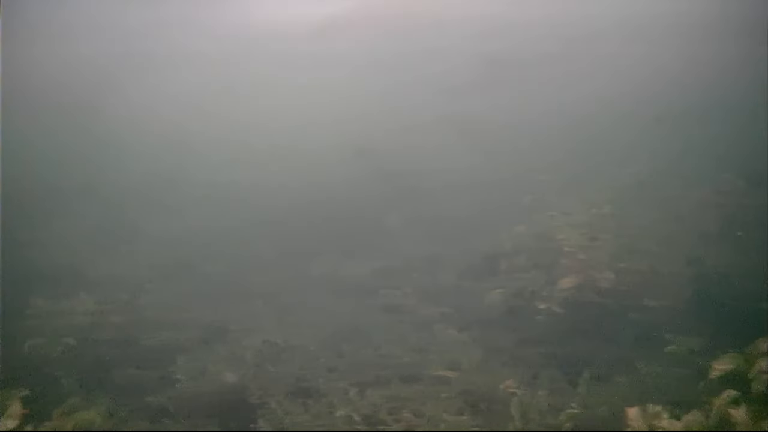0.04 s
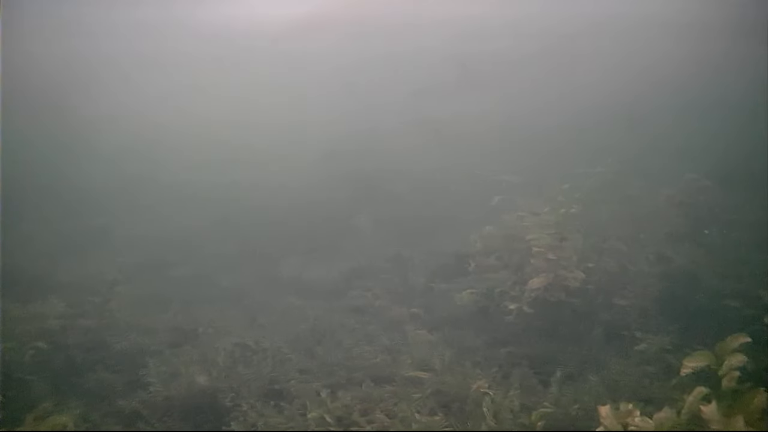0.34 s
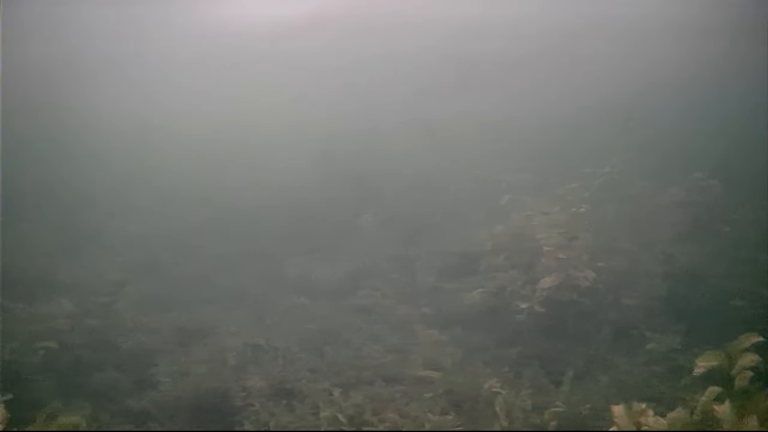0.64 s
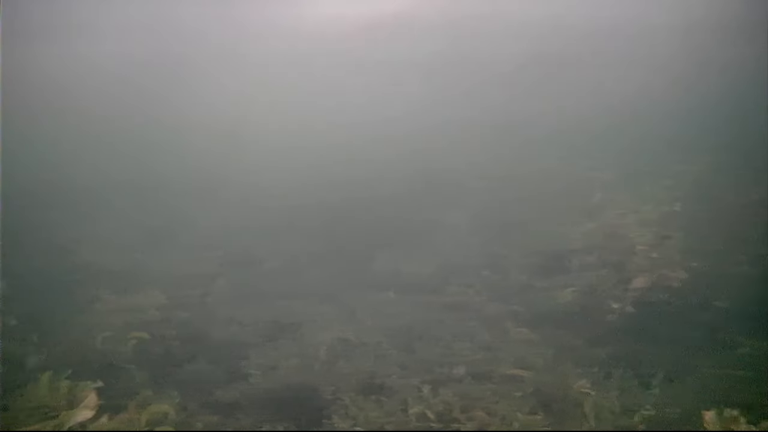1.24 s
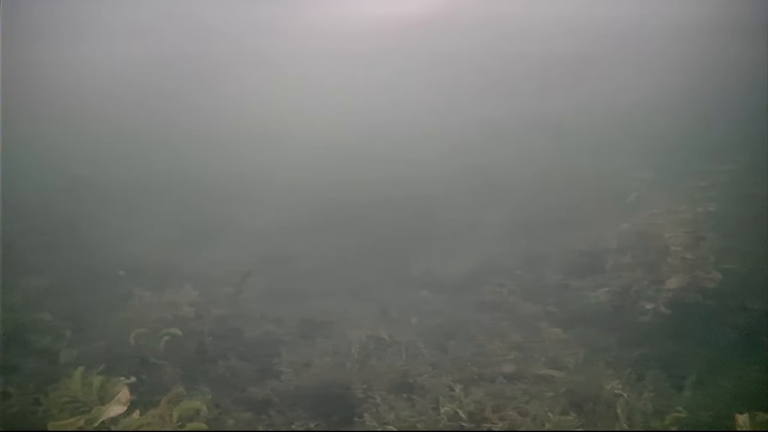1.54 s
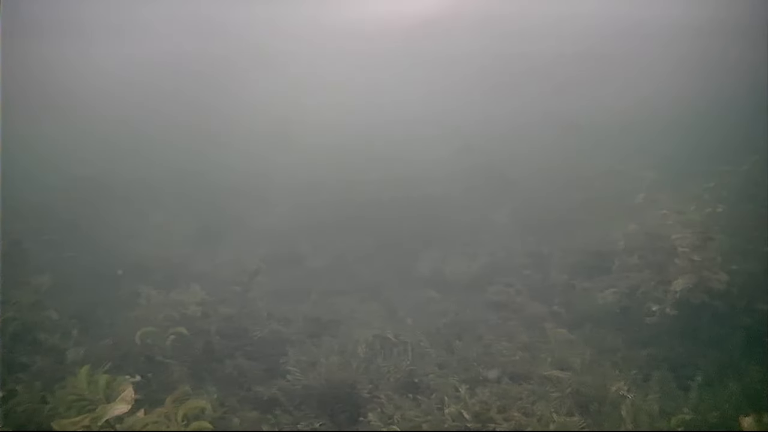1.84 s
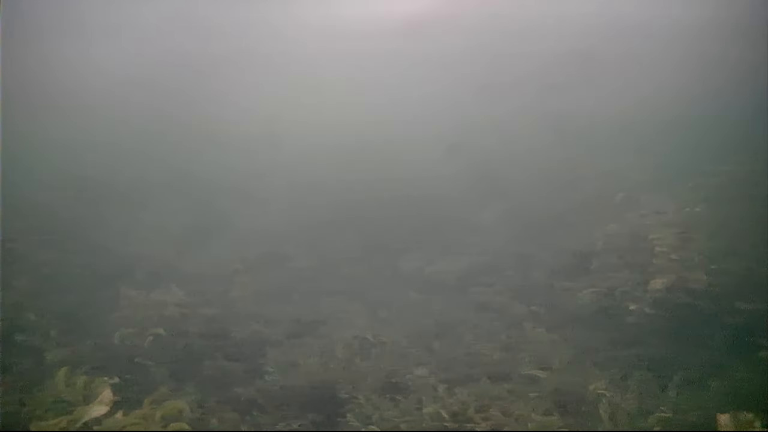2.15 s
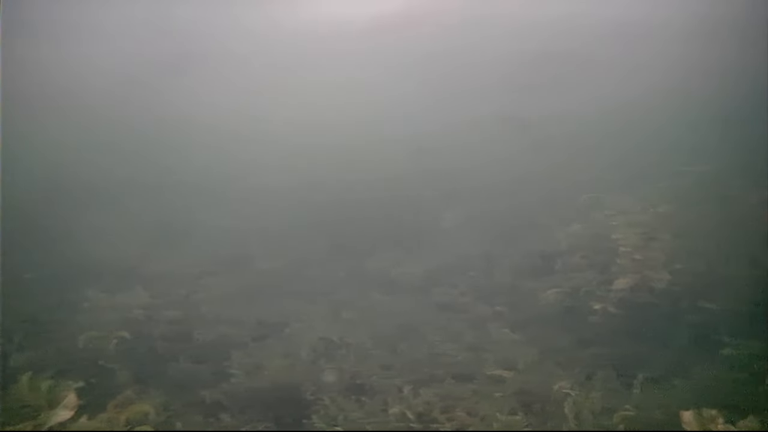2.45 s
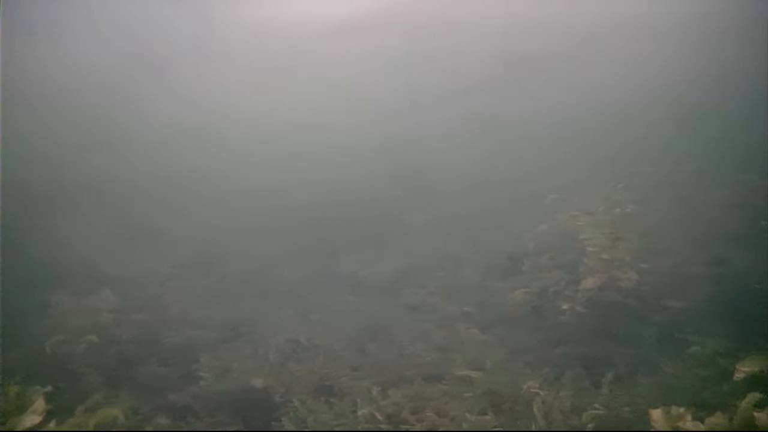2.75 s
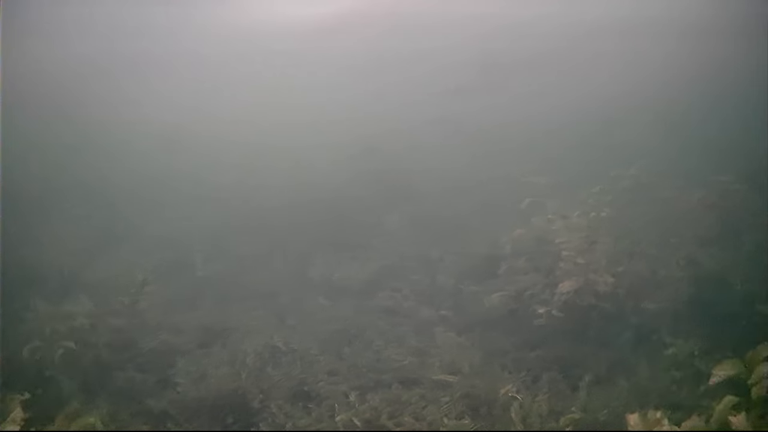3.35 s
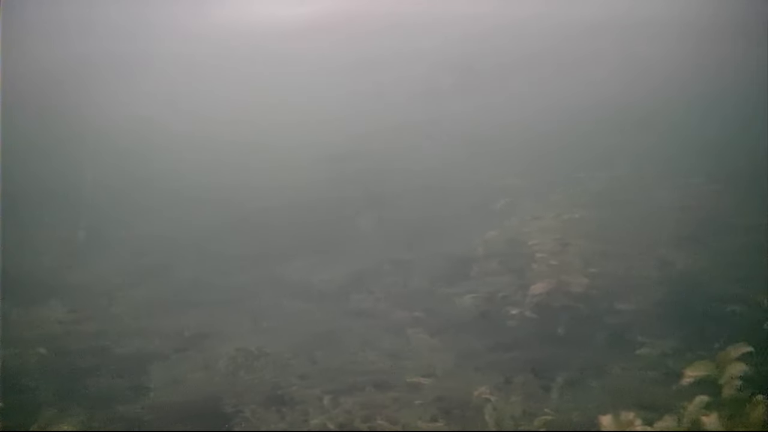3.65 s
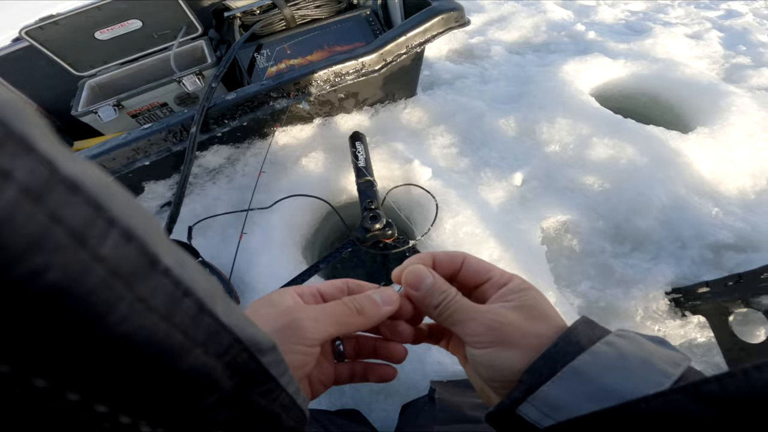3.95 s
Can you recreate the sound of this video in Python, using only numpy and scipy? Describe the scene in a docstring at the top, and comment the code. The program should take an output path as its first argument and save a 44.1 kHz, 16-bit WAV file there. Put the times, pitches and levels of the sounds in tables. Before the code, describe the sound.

Gritty scraping from a dragged cable reaches a microphone under the ice. After a quiet start with light scuffs, it crunches and breaks into rapid, uneven clicks and some soft knocks, while a low rumble and hiss continue.

```python
"""Under water, below ice and snow, a camera hangs on a cable that is dragged across the surface.
Friction excites its housing: gritty scuffs, then a scrape that breaks into sharp stick-slip snaps,
each a crack together with the decaying ring of the housing's modes. Faint ticking, a few dull bumps
and one slow heave of the water come through as well. Two microphone ports hear it all,
over a low rumble and a steady hiss."""
import sys
import numpy as np
from scipy import signal
from scipy.fft import rfft, irfft
from scipy.io import wavfile
from scipy.ndimage import uniform_filter1d

SR = 44100
rng = np.random.default_rng(int(sys.argv[2]) if len(sys.argv) > 2 else 0)


def to_wav(s):
    """Save 16-bit WAV."""
    ch = np.atleast_2d(s).T  # columns
    pcm = np.round(np.clip(ch, -1, 1) * 32767)  # PCM
    wavfile.write(sys.argv[1], SR, pcm.astype(np.int16))


N = 176400
TIME = np.arange(N) / SR
TAP_HZ = abs(np.fft.fftfreq(2048, 1 / SR))  # frequency grid of the colouring filters
GRAIN_T60_S = 0.014  # ring time of a tiny slip

# normal modes of the housing (frequency [Hz], relative level [dB], t60 [s])
HOUSING = [(997, 12.5, 0.069), (1220, 15.5, 0.0077), (1377, 8.5, 0.031), (1506, 11, 0.0075),
           (1818, 5.5, 0.029), (2270, 9.5, 0.021), (2467, 8.5, 0.018), (2833, 4.5, 0.022)]
# envelopes of the scrape's three bands (time [s], middle [dB], treble [dB], low rub [dB])
DRAG = [(1.62, -103, -78, -79), (1.74, -68, -62, -73.5), (1.87, -55.5, -55.5, -59.5), (2.03, -48, -50, -57),
        (2.25, -51, -51.5, -53.5), (2.41, -49, -52, -56.5), (2.49, -49, -49.5, -49.5),
        (2.67, -52.5, -52.5, -57.5), (2.95, -54, -56.5, -67.5), (3.16, -49, -55.5, -59),
        (3.34, -53, -55, -61.5), (3.47, -53.5, -57, -70.5), (3.62, -60.5, -57, -62),
        (3.7, -52.5, -56, -56.5), (3.9, -67, -64.5, -74.5), (4, -65, -62, -72)]
# treble spectrum of tiny slips (frequency [Hz], gain [dB])
GRIT = [(2200, 2), (3400, 6.5), (4100, 5.5), (5600, 0.5), (7300, 1), (8300, -7), (9500, -8), (12500, -8.5),
        (14000, -27), (16000, -43)]


def amp(db):
    """Decibels to amplitude ratio."""
    return 10 ** (np.asarray(db) / 20)


def unit(x):
    """Normalisation to rms 1."""
    return x / np.sqrt(np.mean(x ** 2) + 1e-20)


def burst(x):
    """Normalisation to the energy of 5 ms at rms 1."""
    return x * np.sqrt(.005 * SR / (np.sum(x ** 2, axis=-1, keepdims=True) + 1e-20))


def read(points, hz):
    """Interpolation on a log-frequency axis."""
    f, value = np.transpose(points)
    return np.interp(np.log(hz + 1), np.log(f + 1), value)


def add(mix, s, sound):
    """Superposition: a sound joins the mix at time s."""
    part = mix[..., round(s * SR):][..., :sound.shape[-1]]
    part += sound[..., :part.shape[-1]]


def colour(x, db):
    """Minimum-phase filtering with gains db at TAP_HZ; the ring-out is kept."""
    log_gain = np.log(amp(db))
    taps = np.fft.ifft(np.exp(np.conj(signal.hilbert(log_gain)))).real
    return signal.fftconvolve(x, taps[None, :len(taps) // 2], axes=1)


def noise(points):
    """Spectral shaping of two uncorrelated white noises."""
    white = rfft(rng.standard_normal((2, N)))
    return unit(irfft(white * amp(read(points, np.fft.rfftfreq(N, 1 / SR))), N))


def hiss():
    """Microphone self-noise, uncorrelated between the channels."""
    # noise spectrum (frequency [Hz], relative density [dB])
    spectrum = [(200, 14), (450, 1.5), (750, -4.5), (1500, 0), (2600, -4.5), (3300, -11.5), (5000, -9),
                (7500, -8), (9500, -18), (11200, -12), (12200, -7.5), (13200, -13), (14000, -37)]
    return amp(-67.5) * noise(spectrum)


def rumble():
    """Stationary noise with its energy at low frequencies."""
    # noise spectrum (frequency [Hz], relative density [dB])
    spectrum = [(45, 2.5), (80, 0.5), (100, -1), (111, -3), (120, 4), (128, -4.5), (146, -8), (177, -13.5),
                (230, -24), (280, -32), (400, -48.5), (1500, -99)]
    return amp(-42.5) * noise(spectrum)


def heave():
    """One slow pressure wave in the water, so long that both ports hear it alike."""
    # Gaussian wave packet (centre time [s], peak level [dB], frequency [Hz], 1/e half-width [s])
    packet = (2.578, -25, 13, .04)
    s, db, hz, width = packet
    return amp(db) * np.cos(2 * np.pi * hz * (TIME - s)) * np.exp(-((TIME - s) / width) ** 2)


def ticking(count=400, pace_hz=60, growth_db_per_s=1.5):
    """A filtered impulse train: faint, dull ticks in loosely regular runs with pauses between."""
    # spectrum of a tick (frequency [Hz], gain [dB])
    spectrum = [(300, -11.5), (800, -11.5), (1050, -12), (1550, 2), (2650, -6.5), (3200, -14.5),
                (5000, -15), (16000, -81)]
    jitter, size, pause = rng.standard_normal((count, 3)).T
    gaps = np.exp(.17 * jitter) + .6 * np.maximum(pause, 0) ** 2
    at = (np.cumsum(gaps) / pace_hz * SR).astype(int)
    train = np.zeros((2, N))
    train[0, at[at < N]] = amp(1.7 * size[at < N])
    level_db = -78 + growth_db_per_s * np.minimum(TIME - DRAG[0][0], 0)  # grows until the scrape starts
    return amp(level_db) * unit(colour(train, read(spectrum, TAP_HZ))[:, :N])


def bumps():
    """Impact excitation: soft blows ring the low modes, and a shorter contact sounds brighter."""
    # blows on the housing (time [s], level [dB], contact time [s])
    blows = [(2.349, -27.5, 0.0025), (2.648, -29, 0.0048), (3.561, -22, 0.004), (3.567, -22, 0.00016),
             (3.738, -40, 0.00083), (3.792, -39, 0.003), (3.988, -42, 0.00041), (2.065, -36.5, 0.0019)]
    # modes that a blow excites (frequency [Hz], relative level [dB], t60 [s])
    modes = [(85, -2, 0.12), (254.5, -2, 0.082), (350, -2.5, 0.065), (670, -5, 0.021), (924, -6.5, 0.024),
             (1300, 5, 0.0038)]
    out, t = np.zeros((2, N)), np.arange(SR // 5) / SR
    ring = sum((-1) ** k * amp(db - 60 * t / t60) * np.sin(2 * np.pi * hz * t)
               for k, (hz, db, t60) in enumerate(modes))
    for s, db, contact in blows:
        force = np.sin(np.pi * np.minimum(t / contact, 1)) ** 2
        add(out[0], s, amp(db) * signal.fftconvolve(ring, force / force.sum())[:len(t)])
    return out


def scuffs(rise_s=0.00083, fade_db=-19.5, roughness_db=3.5):
    """Granular crushing: clumps of grains give way in short bursts of rough noise."""
    # crushed clumps (time [s], length [s], level [dB], tilt above 1 kHz [dB/octave])
    clumps = [(0.454, 0.0046, -61.5, 7), (0.524, 0.0099, -51.5, 3.5), (0.534, 0.15, -63.5, -1),
              (0.568, 0.014, -60.5, 0), (0.611, 0.021, -60.5, 1), (0.936, 0.0063, -59.5, 6),
              (1.014, 0.081, -76, 3), (1.137, 0.005, -65.5, -4), (1.176, 0.0055, -63.5, -1),
              (1.514, 0.055, -73, -1), (1.77, 0.0064, -51.5, -1), (1.856, 0.0079, -48.5, 4.5),
              (1.873, 0.026, -46.5, 0), (1.893, 0.02, -39, 0), (1.907, 0.11, -52.5, -1.5),
              (1.924, 0.013, -48, 1), (1.933, 0.0097, -36.5, 2), (1.965, 0.009, -39, 0),
              (2, 0.015, -44, -2), (2.055, 0.016, -39, 1), (2.459, 0.074, -42.5, -7.5),
              (3.85, 0.024, -50, -0.5)]
    # spectrum of a scuff (frequency [Hz], gain [dB])
    spectrum = [(290, -27), (500, -10.5), (831, -12), (919, -3), (1340, -2), (1570, -1), (1790, 6),
                (2750, -6.5), (4050, 0), (6610, -4), (7210, 1), (8700, -6), (12900, -9), (16000, -34)]
    out, grains = np.zeros((2, N)), rng.standard_normal((2, N))
    grains *= amp(roughness_db * rng.standard_normal(N // 32 + 1).repeat(32)[:N])
    octaves = np.log2(np.maximum(TAP_HZ, 1000) / 1000)
    for s, length, db, tilt in clumps:
        t = np.arange(0, length, 1 / SR)
        push = np.minimum(t / rise_s, 1) * amp(fade_db * (t / length) ** 2)
        crush = grains[:, round(s * SR):][:, :len(t)] * push
        sound = colour(crush, read(spectrum, TAP_HZ) + tilt * octaves)
        add(out, s, amp(db) * unit(sound) * np.sqrt(len(t) / sound.shape[1]))
    return out


def grind(spectrum, kinds=10, slips_per_s=3300, spread_db=4):
    """Shot noise: dense, uneven slips, each with one of several short rings, through one filter."""
    slips = (rng.random(N) < slips_per_s / SR) * amp(spread_db * np.minimum(rng.exponential(1, N), 5))
    slips *= rng.choice([-1, 1], N)
    kind, t = rng.integers(0, kinds, N), np.arange(512) / SR
    rings = rng.standard_normal((kinds, 2, len(t))) * amp(-60 * t / GRAIN_T60_S)
    grains = sum(signal.oaconvolve((slips * (kind == k))[None], ring, axes=1)
                 for k, ring in enumerate(rings))
    return unit(colour(grains, read(spectrum, TAP_HZ))[:, :N])


def scrape():
    """Sliding friction of the cable: a ringing middle, a gritty treble and a low rub."""
    # spectrum of the ringing middle (frequency [Hz], gain [dB])
    ringing = [(500, -42), (800, -7.5), (1000, 4.5), (1400, 9.5), (1620, 7.5), (1810, 10.5), (2270, 13.5),
               (2550, -8), (2900, 6), (3500, -23), (5000, -53)]
    # spectrum of the low rub (frequency [Hz], gain [dB])
    rub = [(110, -22), (165, 1.5), (260, -3), (400, -4), (550, -11), (750, -15), (1200, -61), (2500, -46.5)]
    s, middle, treble, low = np.transpose(DRAG)
    bands = (ringing, middle - 1.5), (GRIT, treble - 1.5), (rub, low + 4.5)
    return sum(grind(spectrum) * amp(np.interp(TIME, s, db, left=-np.inf)) for spectrum, db in bands)


def surges(spread_db=4.5, smoothing_s=0.021):
    """Amplitude modulation: the cable's grip comes and goes at random."""
    width = int(smoothing_s * SR)
    grip = uniform_filter1d(uniform_filter1d(rng.standard_normal(N), width), width)
    return amp(spread_db * unit(grip))


def chatter(slips_per_s=140, spread_db=10.5, centre_hz=2220, crack_db=-11):
    """Random excitation: small slips, each with a tiny crack, keep the upper housing modes ringing."""
    # envelope as the cable starts to stick (time [s], level [dB])
    envelope = [(2.2, -63.5), (2.7, -55.5), (2.9, -42.5), (3.18, -50.5), (3.21, -56)]
    t, rings = np.arange(2048) / SR, 0
    slips = (rng.random(N) < slips_per_s / SR) * amp(spread_db * np.clip(rng.standard_normal(N), -2, 1))
    for hz, db, t60 in HOUSING:
        mode = amp(db - 60 * t / t60) * np.sin(2 * np.pi * hz * t)
        mode /= 1 + (2 * np.log2(hz / centre_hz)) ** 2
        rings += signal.oaconvolve(slips * rng.standard_normal((2, N)), mode[None], axes=1)
    crack = rng.standard_normal((2, len(t))) * amp(-60 * t / GRAIN_T60_S)
    cracks = colour(signal.oaconvolve(slips[None], crack, axes=1), read(GRIT, TAP_HZ))
    sound = unit(rings[:, :N]) + amp(crack_db) * unit(cracks[:, :N])
    return sound * amp(np.interp(TIME, *np.transpose(envelope), left=-np.inf, right=-np.inf))


def snaps():
    """Stick-slip: each sudden release cracks and rings the housing modes near its pitch."""
    # slips (time [s], ring level [dB], ring pitch [Hz], crack level [dB], crack pitch [Hz])
    slips = [(2.2286, -35, 1560, -42, 6400), (2.2626, -36.5, 1940, -45, 5840),
             (2.315, -49, 1900, -42, 6700), (2.3438, -41, 2160, -38, 7220),
             (2.3554, -35, 1940, -35.5, 7800), (2.3917, -38.5, 1860, -43.5, 6460),
             (2.484, -33, 1570, -43, 4800), (2.5418, -59, 2140, -39, 6700),
             (2.5905, -28, 1800, -39.5, 5900), (2.635, -35, 2150, -34.5, 7100),
             (2.6478, -34.5, 1660, -36.5, 6860), (2.697, -34, 2370, -35.5, 5500),
             (2.7012, -33, 2300, -36, 6200), (2.7825, -35, 2220, -39, 6540), (2.8105, -38, 2060, -54, 5200),
             (2.866, -50, 2210, -37, 5100), (2.8782, -32.5, 1790, -45, 4900),
             (2.8917, -36, 2200, -41, 5200), (2.8993, -24.5, 2464, -41, 5260),
             (2.9119, -29.5, 1750, -32.5, 4470), (2.935, -45, 1790, -43, 6500),
             (2.9464, -25.5, 2640, -23.5, 5400), (2.955, -35, 2270, -59, 5200),
             (2.9667, -23.5, 2400, -31, 5500), (2.9961, -29, 1610, -47, 5800),
             (3.0029, -27, 2120, -56, 5200), (3.0104, -38, 2080, -46, 5300), (3.016, -39, 2300, -42, 5570),
             (3.0254, -27.5, 2350, -41.5, 5760), (3.056, -63, 2180, -44, 6440),
             (3.0923, -31.5, 2200, -36.5, 6270), (3.1274, -26, 1660, -38, 5530),
             (3.1426, -34, 1970, -42, 5400), (3.1553, -34.5, 2220, -40, 5630),
             (3.1722, -31, 1640, -46, 5900), (3.182, -36, 2160, -43, 5600), (3.201, -17.5, 2010, -23, 4920),
             (3.252, -17, 1790, -27.5, 4630), (3.2827, -26, 1820, -27, 4160),
             (3.2902, -27.5, 1820, -32, 5000), (3.3072, -23, 1750, -24, 4470),
             (3.3245, -35, 1940, -37.5, 5070), (3.3396, -24, 1800, -31, 5930),
             (3.3435, -22.5, 1820, -29, 4180), (3.35, -34.5, 1880, -32, 6900),
             (3.375, -29.5, 1890, -30, 7100), (3.541, -25, 2040, -25.5, 6700),
             (3.6538, -29, 1990, -33.5, 5300), (3.6611, -36.5, 2110, -37, 3940),
             (3.6947, -36.5, 1610, -45, 4280), (3.7191, -40, 2070, -30.5, 5600),
             (3.737, -37.5, 2020, -43, 5500), (3.773, -33.5, 2000, -41.5, 4500),
             (3.8387, -36, 2160, -36, 4930), (3.9423, -39, 2070, -42, 5360)]
    # band of modes excited, narrowing to almost one note (time [s], half-width [octaves])
    ring_width = [(3.26, 0.49), (3.28, 0.17), (3.38, 0.17), (3.65, 0.16)]
    ring_rise_s, overshoot_s, scatter_db, far_modes_db = 0.00024, 0.00079, 2.5, -30
    detune_cycles = 0.67  # random mistuning of a mode, per t60
    crack_rise_s, crack_t60_s, crack_width_oct = 0.00045, 0.016, 0.58
    ripple_db, ripple_spacing_hz = 4.5, 1700  # shifted at random: each crack has its own peaks
    alike = 0.87  # share of a crack's noise power that is the same for every slip
    out, t = np.zeros((2, N)), np.arange(2048) / SR
    attack = (1 - np.exp(-(t / ring_rise_s) ** 2)) * (1 + 0.81 * np.exp(-t / overshoot_s))
    crack_envelope = amp(-60 * t / crack_t60_s) * (1 - np.exp(-t / crack_rise_s))
    shared = rng.standard_normal((2, len(t)))
    hz, db, t60 = np.transpose(HOUSING)[:, :, None]
    for s, ring_db, ring_hz, crack_db, crack_hz in slips:
        size, tune, phase = rng.standard_normal((3, 2, len(hz), 1))
        near = 1 / (1 + (np.log2(hz / ring_hz) / np.interp(s, *np.transpose(ring_width))) ** 4)
        weight = amp(db + scatter_db * size) * (near + amp(far_modes_db))
        mode_hz = hz + detune_cycles * tune / t60
        modes = weight * amp(-60 * t / t60) * np.sin(2 * np.pi * mode_hz * t + np.pi * phase)
        add(out, s, amp(ring_db - 1.5) * burst(modes.sum(1) * attack))

        # spectrum of a crack (frequency [Hz], gain [dB])
        spectrum = [(700, 3), (2500, 1), (3450, 4), (4080, 6), (4750, 3.5), (5400, -1), (5800, -7.5),
                    (6150, 4), (6750, -4), (7250, 1), (9400, -7), (12500, -5.5), (14000, -15), (16000, -33)]
        crack = np.sqrt(alike) * shared + np.sqrt(1 - alike) * rng.standard_normal((2, len(t)))
        focus = -10 * np.log10(1 + (np.log2((TAP_HZ + 1) / crack_hz) / crack_width_oct * 2) ** 2)
        ripple = ripple_db * np.cos(2 * np.pi * (TAP_HZ / ripple_spacing_hz + rng.random()))
        crack = colour(crack * crack_envelope, read(spectrum, TAP_HZ) + focus + ripple)
        add(out, s, amp(crack_db - 3.5) * burst(crack))
    return out


def slip_highpass(x, cutoff_hz=932):
    """High-pass response: slips are too brief to move the housing below its ringing modes."""
    return signal.sosfilt(signal.butter(6, cutoff_hz, "high", fs=SR, output="sos"), x)


def antiresonances(x):
    """Antiresonance: the housing responds weakly away from its modes."""
    # dips in the response (frequency [Hz], half-width [Hz], depth [dB])
    dips = [(1990, 71, 6.5), (3480, 230, 1)]
    loss_db = sum(db / (1 + ((TAP_HZ - hz) / width) ** 2) for hz, width, db in dips)
    return colour(x, -loss_db)[:, :N]


def ports(x, size):
    """Partial coherence: sum and difference of a common and an independent signal feed the two ports."""
    # share of the sound common to both ports (frequency [Hz], coherence [0-1])
    coherence = [(25, 0.87), (80, 1), (260, 0.94), (600, 0.83), (1500, 0.95), (4000, 0.64), (8000, 0.85),
                 (12500, 0.41)]
    # left minus right (frequency [Hz], level difference [dB])
    balance = [(100, 0), (260, -2.5), (600, -3), (1400, 0), (1800, 0), (4000, -1.5), (7500, -1),
               (10500, 0.5), (12500, 5.5)]
    # lead of the left port (frequency [Hz], phase [rad])
    lead = [(140, 0.29), (220, -0.98), (650, -0.43), (1100, -0.51), (1800, -0.81), (3800, -1.17),
            (4800, 0.5), (12000, -0.53)]
    hz = np.fft.rfftfreq(size, 1 / SR)
    common, apart = rfft(x, size)
    same = read(coherence, hz)
    common, apart = common * np.sqrt((1 + same) / 2), apart * np.sqrt((1 - same) / 2)
    lean = amp(read(balance, hz) / 2) * np.exp(.5j * read(lead, hz))
    return irfft(np.array([(common + apart) * lean, (common - apart) / lean]), size)[:, :N]


def scene():
    """Superposition of structure-borne sound, rumble, heave and hiss at the two ports."""
    friction = slip_highpass(snaps() + chatter()) + scuffs() + scrape() * surges()
    contact = antiresonances(friction) + bumps() + ticking()
    return ports(contact, size=N + SR // 10) + ports(rumble(), size=N) + heave() + hiss()


def record(dry):
    """Band limiting: a linear-phase low-pass at 16 kHz."""
    lowpass = signal.firwin(511, 16000, window=("kaiser", 9), fs=SR)
    return signal.oaconvolve(dry, lowpass[None], "same")


dry = scene()
out = record(dry)
to_wav(out)
```